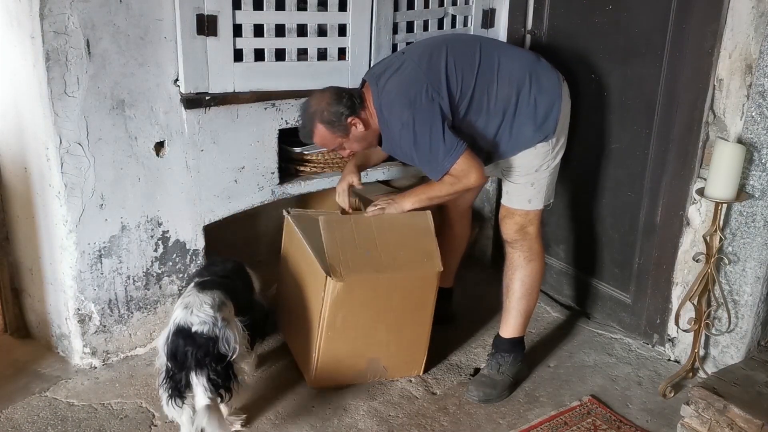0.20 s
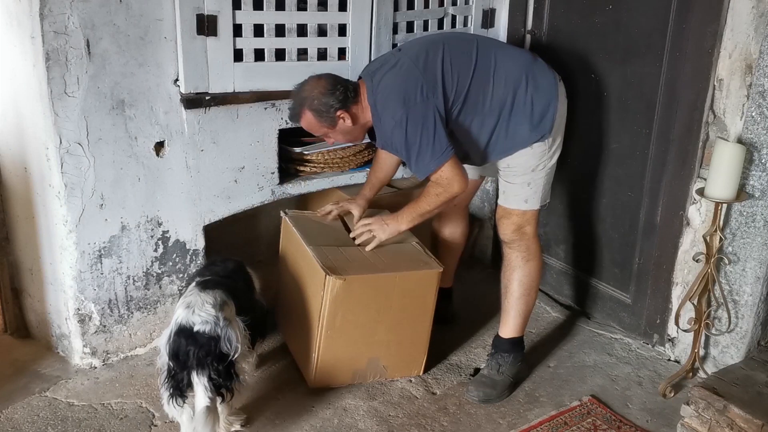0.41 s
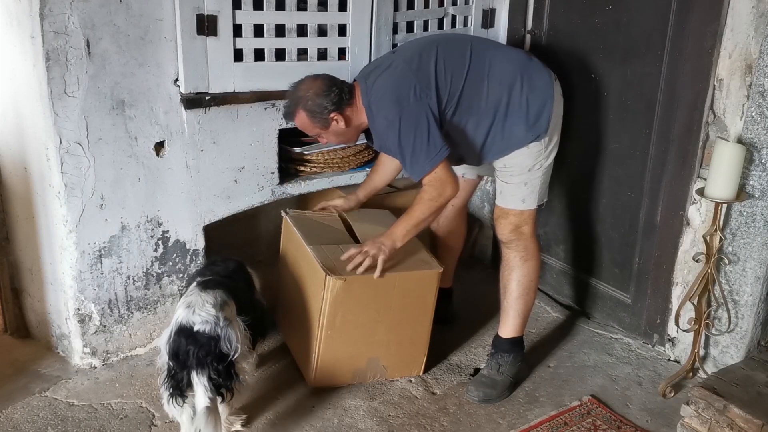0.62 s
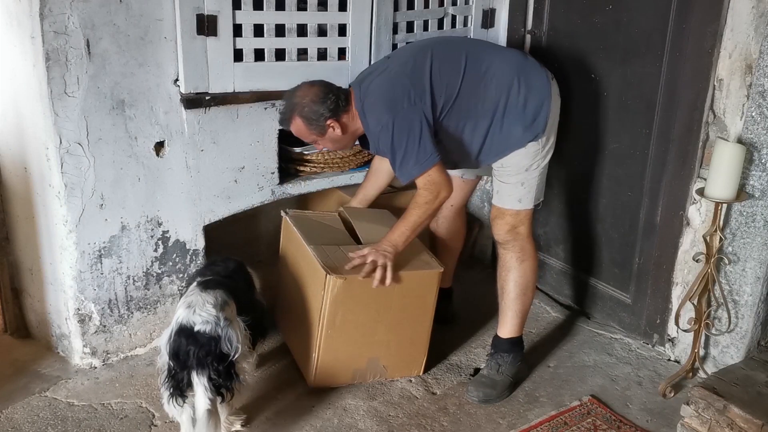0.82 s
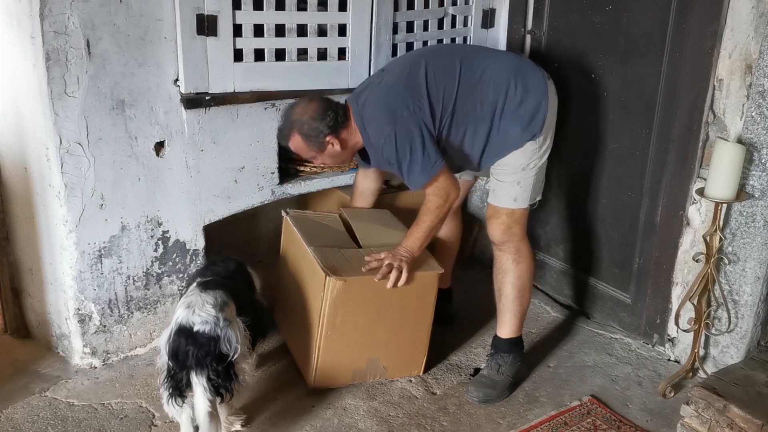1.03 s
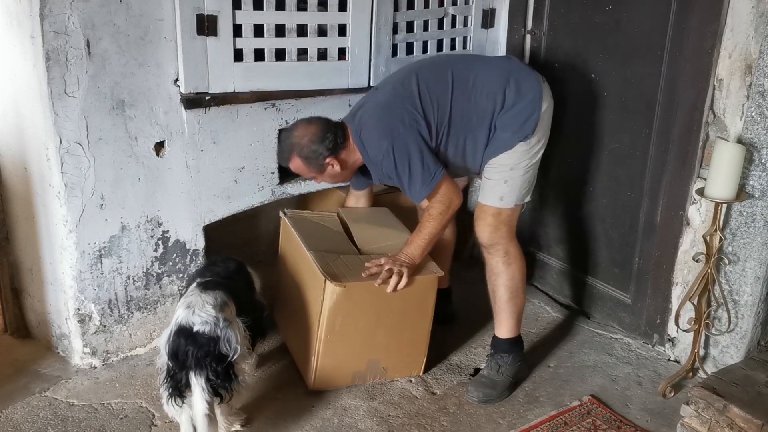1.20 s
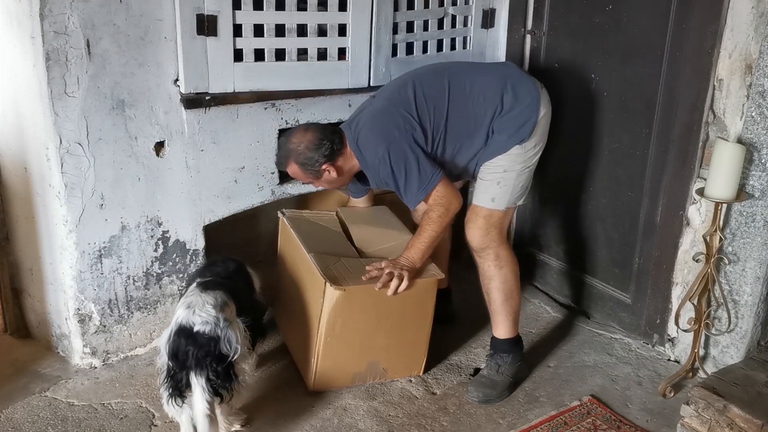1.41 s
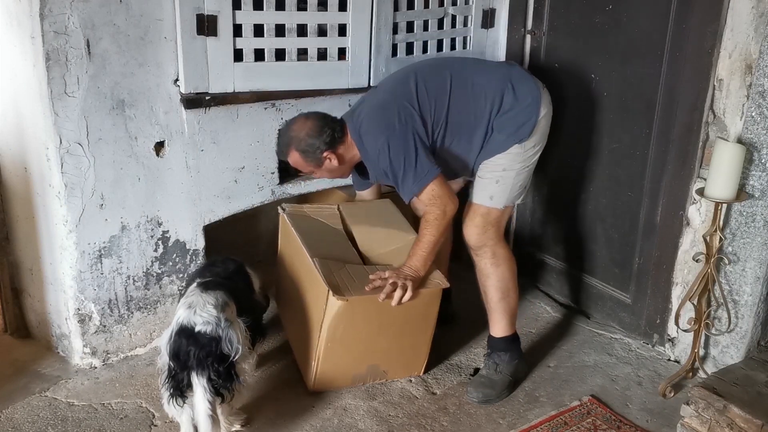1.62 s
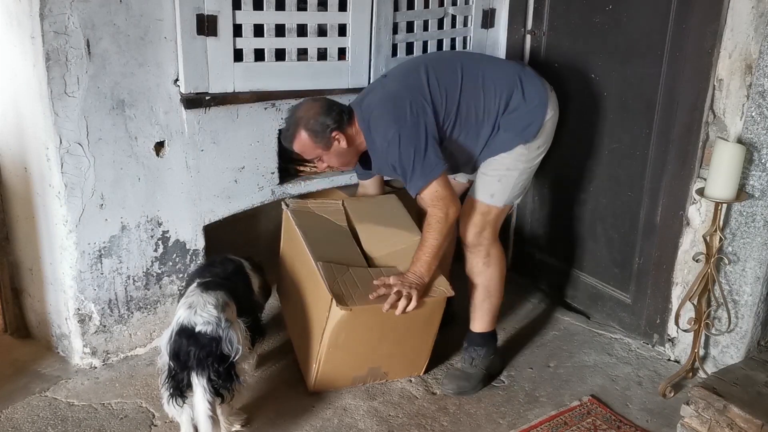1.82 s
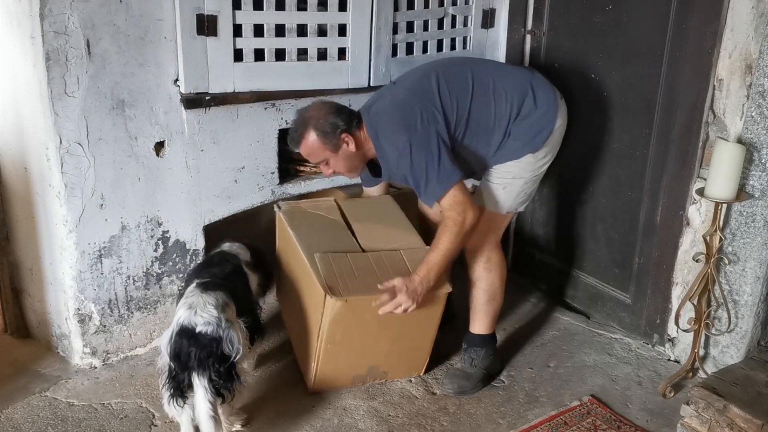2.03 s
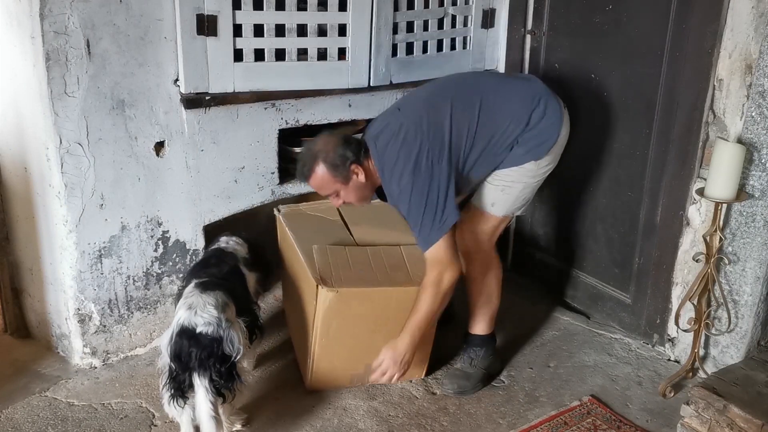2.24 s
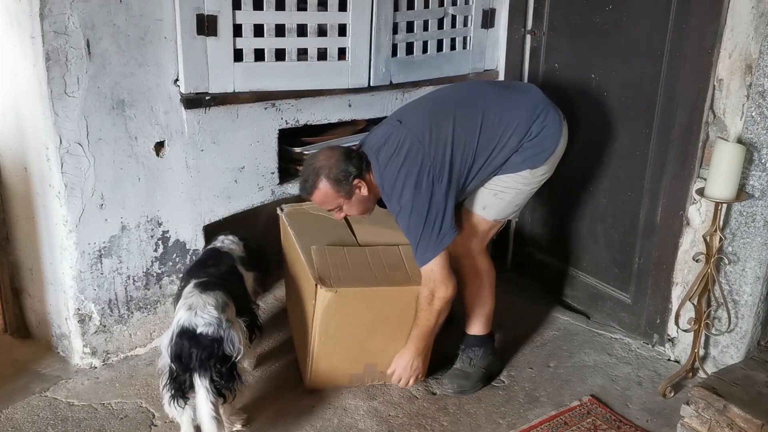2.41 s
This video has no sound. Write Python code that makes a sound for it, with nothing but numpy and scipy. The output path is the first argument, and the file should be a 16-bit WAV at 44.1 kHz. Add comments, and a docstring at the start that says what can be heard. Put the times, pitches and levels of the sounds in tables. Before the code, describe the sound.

Cardboard box handled: flaps rustle briskly, a hollow double thump as they drop, softer knocks, then gritty scraping strokes on concrete growing louder, with tiny grit snaps; small stone room, close stereo microphones, quiet low room tone.

```python
"""Cardboard flaps rub and bump down as a box is folded shut, then it is pushed over gritty concrete
in short scraping strokes; grit snaps underneath and the walls of a small stone room ring briefly.
Strokes are grainy noise that also sets the panels droning; bumps are decaying sines with a dull crush,
both passed through box resonances. Snaps are short noise bursts. Quiet room tone lies beneath."""
import sys
import numpy as np
from scipy import signal
from scipy.fft import rfft, irfft
from scipy.io import wavfile

SR = 44100
rng = np.random.default_rng(int(sys.argv[2]) if len(sys.argv) > 2 else 0)


def to_wav(sig):
    """Store sig (one row per channel, or 1-D mono) as 16-bit WAV at the path in sys.argv[1].

    Samples outside -1..1 are clipped; the rate is SR.
    """
    pcm = np.clip(np.atleast_2d(sig), -1, 1) * 32767
    pcm = np.round(pcm).astype(np.int16)
    wavfile.write(sys.argv[1], SR, pcm.T)  # frames by channels


N = 112455

# resonances of the hollow box and its corner: pitch_hz, level_db, t60_s
BOX_TONES = [(82.7, 11, 0.42), (157, 2, 0.35), (223.1, -0.5, 1), (245.6, -4.5, 0.083), (345, -3, 0.63),
             (574, -19, 0.33), (645, 6, 0.083)]
JUDDER_HZ = 48.2  # upper corner of the random level flicker


def from_db(db):
    """Decibels to amplitude."""
    return 10 ** (np.asarray(db) / 20)


def rms_one(x):
    """Scale to rms 1."""
    return x / np.sqrt(np.mean(x ** 2) + 1e-20)


def at_hz(points, hz):
    """Read a table on a log-frequency axis."""
    point_hz, value = np.transpose(points)
    return np.interp(np.log(np.maximum(hz, 1)), np.log(point_hz), value)


def bin_hz():
    """Frequencies of the N-point spectrum."""
    return np.arange(N // 2 + 1) * SR / N


def coloured(x, spectrum):
    """Filter by a spectrum table, then scale to rms 1."""
    gain = from_db(at_hz(spectrum, bin_hz()))
    return rms_one(irfft(rfft(x) * gain, N))


def butter(x, hz, kind):
    """Second-order-design Butterworth filter."""
    sos = signal.butter(2, hz, kind, fs=SR, output="sos")
    return signal.sosfilt(sos, x + 1e-18)


def drift(hz):
    """Low-passed noise of rms 1, settled for a second first."""
    return rms_one(butter(rng.standard_normal(N + SR), hz, "low")[SR:])


def since(start_s):
    """Seconds since a moment, zero before it."""
    return np.maximum(np.arange(N) / SR - start_s, 0)


def diffuse_noise():
    """White stereo noise whose left-right likeness is high in the bass and low in the treble."""
    # left-right likeness of the room: freq_hz, correlation
    likeness = [(60, 0.9), (250, 0.87), (600, 0.4), (1200, -0.011), (4000, -0.074), (14000, 0.26)]
    mid, side = rfft(rng.standard_normal((2, N)))
    alike = np.clip(at_hz(likeness, bin_hz()), -.99, .99)
    common = np.sqrt((1 + alike) / 2) * mid
    opposed = np.sqrt((1 - alike) / 2) * side
    return irfft(common + opposed * [[1], [-1]], N)


def at_microphones(x):
    """Direct sound reaches the right microphone a little later."""
    right_lag_s = .00004
    delay = np.exp(-2j * np.pi * bin_hz() * right_lag_s)
    return np.array([x, irfft(rfft(x) * delay, N)])


def strokes():
    """Each stroke rises, swells or fades, and stops; returns the drive of rasp, hiss and panel drone."""
    # rubs of the flaps, then slides on the floor; levels are drives ahead of the mix gains:
    # start_s, length_s, attack_s, rasp_db, hiss_db, drone_db, swell_db (over the stroke)
    stroke_rows = [(0.091, 0.075, .04, -75.5, -75, -78, 6), (0.155, 0.062, 0.042, -65, -62.5, -49, -2),
                   (0.199, 0.056, 0.0097, -49.5, -41.5, -50, 6),
                   (0.255, 0.039, 0.035, -48, -38.5, -42.5, -6), (0.303, 0.11, 0.008, -61, -88, -50, 6.5),
                   (0.488, 0.073, 0.027, -59, -54.5, -50, 0.5), (0.573, 0.061, 0.022, -58.5, -63.5, -44, 8),
                   (.66, 0.15, 0.025, -60.5, -63, -56.5, -10.5), (0.704, 0.022, 0.033, -71, -50.5, -63, 5),
                   (0.804, 0.059, 0.016, -58.5, -51.5, -83, 5),
                   (0.863, 0.19, 0.047, -64, -56.5, -80, -20.5), (1.05, 0.2, 0.048, -52, -49.5, -52.5, -8),
                   (1.268, 0.11, 0.012, -60, -94, -60.5, -2), (1.325, 0.26, 0.042, -52.5, -57, -54.5, 1),
                   (1.587, 0.15, 0.0076, -78, -66, -63.5, -1), (1.696, 0.17, 0.034, -50, -62.5, -61, 6.5),
                   (1.863, 0.12, 0.0088, -54.5, -64, -58.5, 1.5), (2.037, 0.13, 0.057, -46, -54.5, -57, 0),
                   (2.176, 0.078, 0.031, -45, -46, -51, -7), (2.274, 0.066, 0.012, -58.5, -59, -58.5, 7),
                   (2.336, 0.075, 0.0043, -51.5, -59.5, -75, -3), (2.449, .11, 0.011, -52, -57, -61, -5)]
    release_s, judder_db = 0.014, 0.5  # release time constant, rms judder
    levels = np.zeros((3, N))
    for start_s, length_s, attack_s, rasp_db, hiss_db, drone_db, swell_db in stroke_rows:
        t = since(start_s)
        attack = np.minimum(t / attack_s, 1)
        release = np.exp(-since(start_s + length_s) / release_s)
        swell = from_db(swell_db * (np.minimum(t / length_s, 1) - .5))
        levels += from_db([[rasp_db], [hiss_db], [drone_db]]) * attack * release * swell
    return levels * from_db(judder_db * drift(JUDDER_HZ))


def friction(spectrum):
    """Thousands of tiny slips of uneven size over a smooth rub, coloured."""
    grains_per_s, grain_spread_db, smooth_share = 3500, 3, 0.25
    spread = np.minimum(rng.exponential(1, N), 5)
    sizes = from_db(grain_spread_db * spread) * rng.choice([-1, 1], N)
    slips = rms_one(sizes * (rng.random(N) < grains_per_s / SR))
    return coloured(slips + smooth_share * rng.standard_normal(N), spectrum)


def lingering(level, t60_s):
    """Amplitude of reflections: drive energy smoothed by an exponential decay."""
    keep = from_db(-60 / (t60_s * SR)) ** 2
    return np.sqrt(signal.lfilter([1 - keep], [1, -keep], level ** 2 + 1e-18))


def scrape(level, spectrum):
    """Direct grainy friction; the moving contact blurs its reflections to a wash, treble dying first."""
    direct_db, diffuse_db, flicker_db = -7.5, -2.5, 1.0
    wash_t60_s, treble_t60_s, treble_hz = 0.51, 0.2, 8400
    flicker = from_db(flicker_db * drift(JUDDER_HZ))
    noise = coloured(diffuse_noise(), spectrum) * flicker
    dull = irfft(rfft(noise) / (1 + (bin_hz() / treble_hz) ** 4), N)
    treble = noise - dull
    wash = lingering(level, wash_t60_s) * dull + lingering(level, treble_t60_s) * treble
    direct = at_microphones(level * friction(spectrum))
    return from_db(direct_db) * direct + from_db(diffuse_db) * wash


def panel_drone(level):
    """Friction drives the panels with bass-heavy noise."""
    # drone colour: freq_hz, relative_db_per_hz
    drone_colour = [(25, -8), (55, 7.5), (80, -9.5), (115, -2.5), (160, 1.5), (235, 3), (290, -3),
                    (340, -3), (450, -9.5), (700, -13), (1200, -19), (3000, -84)]
    drone_db = -3
    return from_db(drone_db) * level * friction(drone_colour)


def bumps():
    """A bumped panel swings as a decaying sine, with a dull crush of cardboard at the contact."""
    # bumps of flaps and panels, ahead of the box resonances: start_s, level_db, pitch_hz, t60_s
    bump_rows = [(.222, -46, 72, .08), (.226, -42, 235, .15), (.372, -47, 215, .1), (.518, -53, 70, .15),
                 (.612, -33, 240, .1), (.6245, -35, 242, .14), (.636, -41, 560, .09),
                 (.6405, -27, 156, .08), (.644, -38, 75, .12), (.6475, -26.5, 160, .055),
                 (.649, -36, 340, .1), (.69, -45, 55, .07), (.7, -43, 215, .2), (.84, -43, 68, .18),
                 (.842, -45, 160, .1), (1.074, -38, 125, .07), (1.08, -49, 680, .1), (1.082, -40, 190, .06),
                 (1.087, -36, 65, .08), (1.096, -42, 350, .07), (1.1, -38, 100, .24), (1.2, -50, 110, .08),
                 (1.425, -46, 52, .18), (1.47, -47, 100, .1), (2.262, -44, 70, .05), (2.242, -38, 46, .07)]
    attack_s, crush_db, crush_hz = 0.001, -41, 684  # crush relative to the swing, before pitch scaling
    out = np.zeros(N)
    crush = from_db(crush_db) * rms_one(butter(rng.standard_normal(N), crush_hz, "low"))
    for start_s, level_db, pitch_hz, t60_s in bump_rows:
        t = since(start_s)
        shape = (1 - np.exp(-t / attack_s)) * from_db(level_db - 60 * t / t60_s)
        swing = np.sin(2 * np.pi * pitch_hz * t)
        out += shape * (swing + crush * np.sqrt(pitch_hz / BOX_TONES[1][0]))
    return out


def hollow_box(x):
    """The box rings on at its own tones: two-pole resonators added to the input."""
    out = x.copy()
    for pitch_hz, level_db, t60_s in BOX_TONES:
        radius = from_db(-60 / (t60_s * SR))
        edge = (1 - radius * radius) / 2
        poles = [1, -2 * radius * np.cos(2 * np.pi * pitch_hz / SR), radius * radius]
        out += from_db(level_db) * signal.lfilter([edge, 0, -edge], poles, x + 1e-18)
    return out


def snaps():
    """Crunches and grit snaps are band-passed dying bursts; returns the sound and its room feed."""
    # start_s, level_db (nominal, before a gain of 2), low_hz, high_hz, decay_s (time constant), room_db
    snap_rows = [(0.263, -40.5, 1320, 4500, 0.012, 2), (0.368, -40, 540, 1230, .009, -3),
                 (0.507, -39.5, 710, 1280, 0.013, 0), (0.51, -50.5, 3880, 5930, 0.0089, 4),
                 (0.535, -31.5, 555, 855, 0.0037, -4), (0.576, -43, 553, 950, 0.0042, -4),
                 (0.604, -42, 400, 696, .009, -2), (.82, -48, 955, 1620, 0.0035, 2),
                 (0.841, -49.5, 600, 1820, 0.016, -8), (1.082, -45, 565, 1390, 0.018, -4),
                 (1.735, -49, 4000, 11000, 0.00067, -4), (1.8555, -36, 1800, 10500, 0.00039, -14),
                 (1.904, -27, 5500, 14000, .0005, -24), (2.3417, -30.5, 1000, 4860, 0.00078, -8.5),
                 (2.3502, -36, 1100, 5500, .001, -9), (2.353, -45, 1450, 2830, 0.021, 0.5),
                 (2.509, -45.5, 3000, 9000, 0.00088, -14), (2.52, -39, 3530, 10000, 0.0007, -10),
                 (2.525, -36.5, 7470, 8700, 0.0023, -12)]
    out, to_room = np.zeros((2, N))
    for start_s, level_db, low_hz, high_hz, decay_s, room_db in snap_rows:
        t = since(start_s)
        burst = rng.choice([-1, 1], N) * (t > 0) * np.exp(-t / decay_s)
        crack = from_db(level_db) * 2 * butter(burst, [low_hz, high_hz], "band")
        out += crack
        to_room += from_db(room_db) * crack
    return out, to_room


def stone_room(x):
    """Convolve with dense decaying noise in nine bands, each with its own decay and level."""
    # reverberation time: freq_hz, t60_s
    room_t60 = [(100, 0.26), (500, 1), (2000, 0.57), (6000, 0.15), (14000, 0.1)]
    # reverberation over the direct sound: freq_hz, level_db
    room_level = [(60, 8.5), (250, -7), (600, -8), (1500, 3), (5000, 1.5), (14000, 12)]
    build_up_s = 0.0085
    t, hz, noise = since(0), bin_hz(), rfft(diffuse_noise())
    centres_hz = np.geomspace(60, 15000, 9)
    tail = 0
    for centre_hz, pick in zip(centres_hz, np.eye(len(centres_hz))):
        weight = np.interp(np.log(hz + 1), np.log(centres_hz), pick)
        band = irfft(noise * weight, N)
        decay = from_db(-60 * t / at_hz(room_t60, centre_hz)) * np.minimum(t / build_up_s, 1)
        unit_decay = decay / np.sqrt(np.sum(decay ** 2))
        tail = tail + band * unit_decay * from_db(at_hz(room_level, centre_hz))
    return signal.fftconvolve(x[None], tail[:, :SR], axes=1)[:, :N]  # tail kept for 1 s


def room_tone():
    """Steady, bass-heavy diffuse noise."""
    # room tone colour: freq_hz, relative_db_per_hz
    tone_colour = [(20, -4.5), (50, -2.5), (80, -0.5), (120, -9.5), (250, -7), (450, -21), (1000, -27),
                   (3000, -34.5), (6000, -40.5), (10000, -43.5), (16000, -70)]
    tone_db = -61.5
    return from_db(tone_db) * coloured(diffuse_noise(), tone_colour)


def scene():
    """Scrapes, bumps and grit in the room, over quiet room tone."""
    # friction colours: freq_hz, relative_db_per_hz
    rasp_colour = [(200, 0.5), (450, 3.5), (750, 3), (1100, 0.5), (2200, 1), (3300, -0.5), (4800, -2.5),
                   (6500, -9), (10000, -12), (16000, -44)]
    # same columns
    hiss_colour = [(500, -78.5), (2000, -12.5), (4800, -2.5), (6600, -4.5), (7400, -6), (7900, 3),
                   (8800, -6), (10600, 1), (12000, -7.5), (14000, -12), (16000, -21.5)]
    diffuse_above_hz = 260  # box sound below this corner feeds the room less
    rasp, hiss, drone = strokes()
    scrapes = scrape(rasp, rasp_colour) + scrape(hiss, hiss_colour)
    box = hollow_box(panel_drone(drone) + bumps())
    grit, grit_to_room = snaps()
    room = stone_room(butter(box, diffuse_above_hz, "high") + grit_to_room)
    return scrapes + at_microphones(box + grit) + room + room_tone()


def record(dry):
    """The two microphones differ in colour; a steep low-pass cuts the top."""
    # left minus right, split evenly between them: freq_hz, difference_db
    balance = [(100, 2), (700, 1.7), (1500, .5), (3500, .3), (5800, 1), (7200, -12), (8300, 3), (14000, 7)]
    cutoff_hz = 15650
    hz = np.arange(N + 1) * SR / (2 * N)  # zero-padded to 2N
    colour = from_db(at_hz(balance, hz) * [[.5], [-.5]])
    low_pass = 1 / np.sqrt(1 + (hz / cutoff_hz) ** 160)
    return irfft(rfft(dry, 2 * N) * colour * low_pass)[:, :N]


dry = scene()
out = record(dry)
to_wav(out)
```